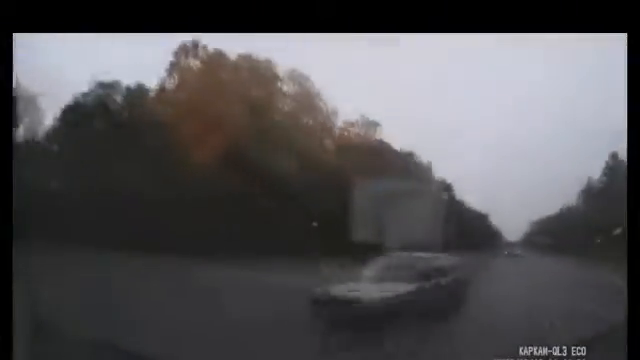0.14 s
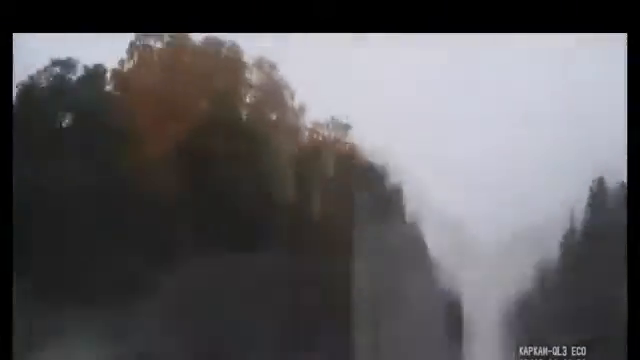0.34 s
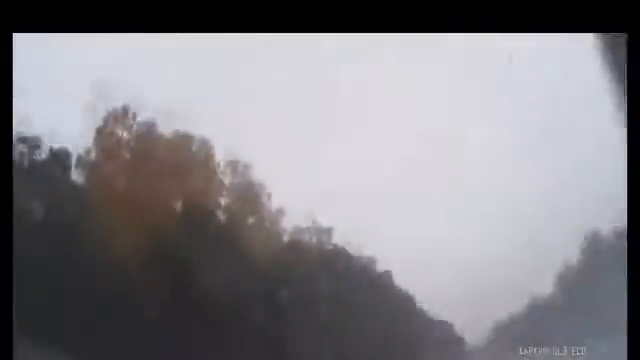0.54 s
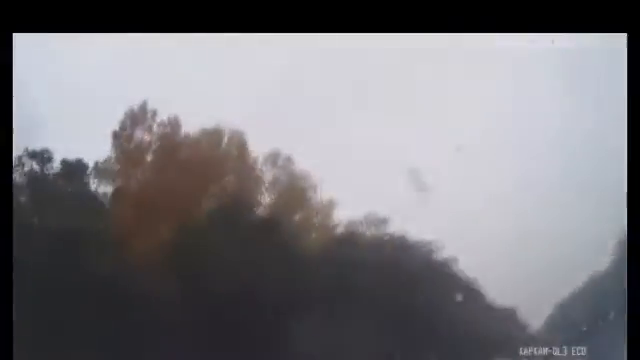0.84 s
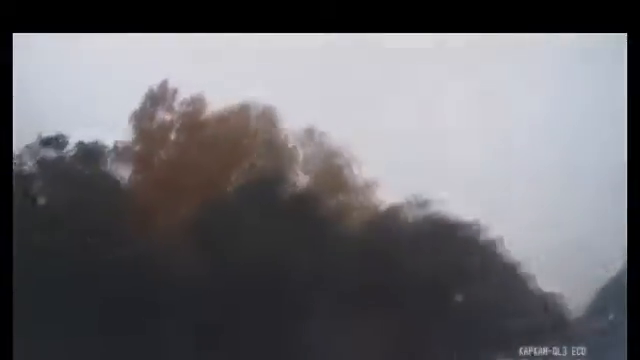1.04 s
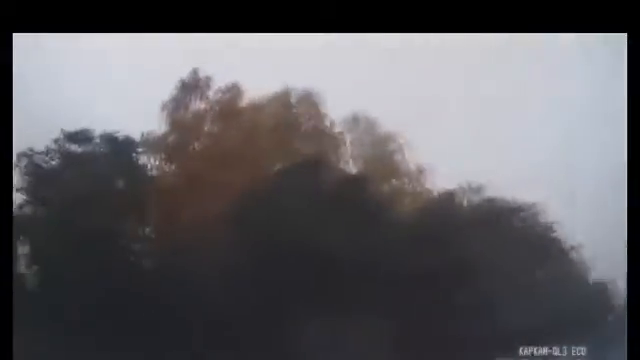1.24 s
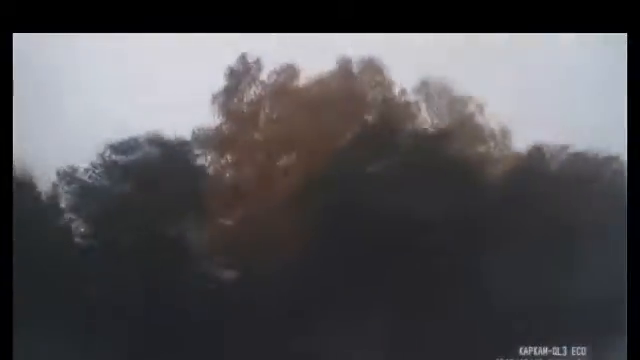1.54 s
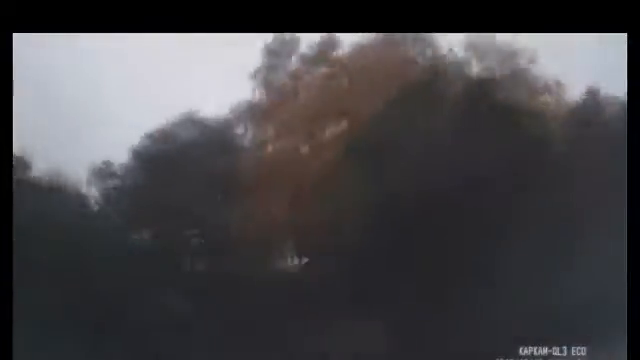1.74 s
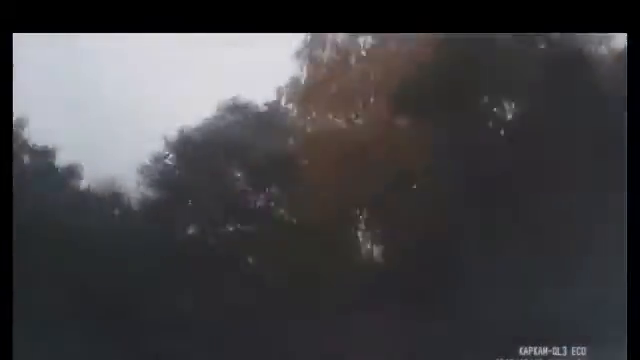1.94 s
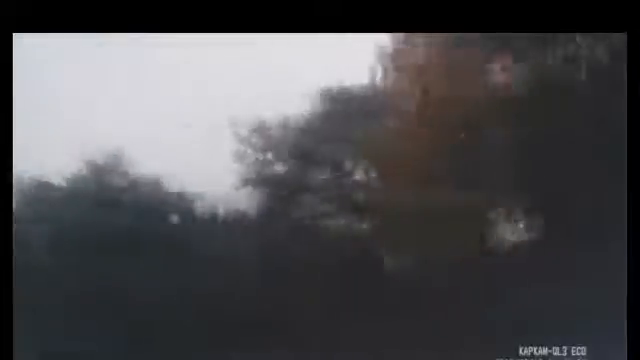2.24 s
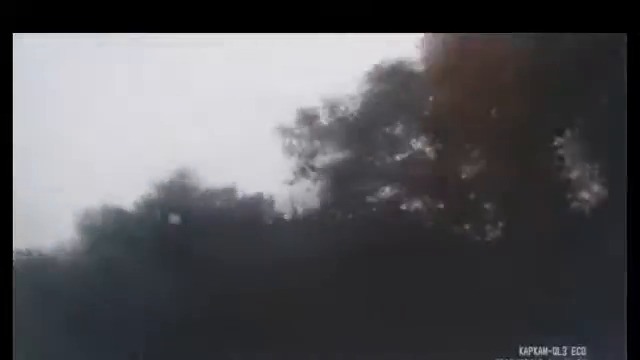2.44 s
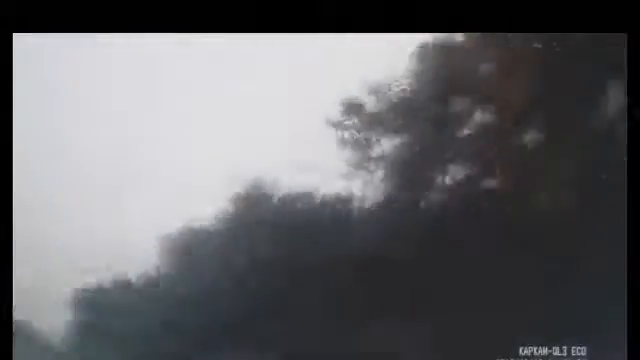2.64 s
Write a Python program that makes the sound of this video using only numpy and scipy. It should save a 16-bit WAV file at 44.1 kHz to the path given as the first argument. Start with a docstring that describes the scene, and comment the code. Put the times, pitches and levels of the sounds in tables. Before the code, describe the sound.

Violent car collision from the cabin, a booming smash and cracks, then rough jolting off the road.

```python
"""Inside a car, a collision is heard through an overloaded dashboard microphone.
Filtered noise and clicks make the rumble, tyre roar and grit; thumps ring under them. Jolts are decaying sines,
crumpling metal is dense clicks through panel resonances, and cracks are noise bursts with a short ring.
Splinters patter down as pitched clicks, stones tick on the body, and loose plastic trim knocks and squeaks."""
import sys
import numpy as np
from scipy import signal
from scipy.fft import rfft, irfft
from scipy.io import wavfile
from scipy.ndimage import uniform_filter1d

SR = 44100
rng = np.random.default_rng(int(sys.argv[2]) if len(sys.argv) > 2 else 0)


def transcribe(signal):
    """Save signal, clipped to [-1, 1], as a 16-bit WAV file at the path in sys.argv[1]."""
    frames = np.atleast_2d(signal).T
    limited = np.clip(frames, -1, 1)
    pcm = np.round(limited * 32767).astype(np.int16)
    wavfile.write(sys.argv[1], SR, pcm)


N = 123479  # length in samples
T = np.arange(N) / SR  # time of each sample, s
HZ = np.maximum(np.fft.rfftfreq(N, 1 / SR), 1)

# tyres on road and verge, relative levels over time: time_s, roar_db, grit_db
GROUND_LEVELS = [(0, -29.5, -43), (.17, -38, -49), (.23, -29, -44), (.44, -28, -42.5), (.5, -14.5, -9),
                 (.66, -17.5, -24), (.76, -15, -23), (.8, -22, -33), (.88, -24.5, -33.5),
                 (1.04, -23.5, -34), (1.35, -22.5, -37.5), (1.69, -19.5, -35.5), (1.82, -29, -42),
                 (1.92, -27.5, -39.5), (1.97, -27, -37), (2.11, -31.5, -38), (2.4, -36, -46),
                 (2.8, -32.5, -47)]
# spectrum of the tyre roar: frequency_hz, relative_level_db (per Hz)
ROAR_SPECTRUM = [(120, -29), (250, 9), (400, -2.5), (520, 4), (750, -1.5), (1100, -8), (1550, -31),
                 (2100, -11), (2800, -54), (5000, -106)]
# spectrum of grit and of the click in a trim knock: frequency_hz, relative_level_db (per Hz)
GRIT_SPECTRUM = [(900, 22), (2200, 18.5), (3400, 5.5), (4900, 4.5), (7000, 0.5), (10000, -5.5),
                 (12500, -13)]
# small contacts that excite both the metal and the trim
FOLDS_PER_S, FOLD_SPREAD_DB = 3000, 2.9
CRUNCH_ATTACK_S = 0.0032  # the splinters share it


def from_db(db):
    """Decibels to gain."""
    return 10 ** (np.asarray(db) / 20)


def rms_one(x):
    """Scale to rms 1."""
    return x / np.sqrt(np.mean(x ** 2) + 1e-20)


def gains(rows):
    """Each dB column of a curve as a gain per sample."""
    times_s, *columns_db = np.transpose(rows)
    return [from_db(np.interp(T, times_s, column)) for column in columns_db]


def colour(x, spectrum):
    """Give a steady signal a spectrum that falls away past its ends; rms 1."""
    hz, db = np.transpose(spectrum)
    ends = np.minimum(1, HZ / hz[0]) ** 2 * np.minimum(1, hz[-1] / HZ) ** 2
    curve = from_db(np.interp(np.log(HZ), np.log(hz), db))
    return rms_one(irfft(rfft(x) * ends * curve, N))


def cut(x, hz, kind="low", order=2):
    """Butterworth low- or high-pass."""
    sos = signal.butter(order, min(hz, .45 * SR), kind, fs=SR, output="sos")
    return signal.sosfilt(sos, x + 1e-18)


def band(x, hz, width):
    """Band-pass around a pitch; the width is a share of that pitch."""
    edges_hz = np.clip(hz * np.exp(np.array([-.5, .5]) * width), 10, .45 * SR)
    return signal.sosfilt(signal.butter(2, edges_hz, "band", fs=SR, output="sos"), x + 1e-18)


def even(x, span_s):
    """Even out swells slower than the span."""
    power = np.abs(uniform_filter1d(x * x, max(int(span_s * SR), 2)))
    return x / np.sqrt(power + 1e-6)


def ring(x, hz, t60):
    """Two-pole resonance: a unit click sets a sine of about height 1 ringing."""
    r = from_db(-60 / (t60 * SR))  # decay per sample
    w = 2 * np.pi * hz / SR
    return signal.lfilter([0, np.sin(w)], [1, -2 * r * np.cos(w), r * r], x + 1e-18)


def envelope(start, attack, hold, t60):
    """Linear attack, hold, exponential release."""
    age = T - start
    release = np.log(1000) * np.maximum(age - attack - hold, 0) / t60
    return np.clip(age / attack, 0, 1) * np.exp(-np.minimum(release, 20))


def grains(per_s, spread_db):
    """Random clicks of uneven size and random polarity."""
    sizes = from_db(spread_db * np.minimum(rng.exponential(1, N), 4))
    sizes = sizes * rng.choice([-1, 1], N)
    return sizes * (rng.random(N) < per_s / SR)


def scatter(per_s, spread_db, low_hz, high_hz, cycles, count=16):
    """Random contacts ring on a ladder of pitches, falling 60 dB in the given cycles; rms 1."""
    clicks, dealt = grains(per_s, spread_db), rng.integers(0, count, N)
    pitches_hz = np.geomspace(low_hz, high_hz, count)
    return rms_one(sum(ring(clicks * (dealt == k), hz, cycles / hz) for k, hz in enumerate(pitches_hz)))


def ride():
    """The body rumbles and booms; tyres roar over stones, clods thump the floor pan, and grit flies."""
    # body noise, relative levels over time: time_s, rumble_db, boom_db
    ride_levels = [(0, -16, -25), (.19, -22, -33), (.23, -14, -22.5), (.41, -20.5, -18.5), (.5, -11.5, -17),
                   (.68, -9.5, -11), (.86, -14.5, -14), (1.05, -15.5, -20), (1.3, -15, -16),
                   (1.6, -11, -15.5), (1.85, -13, -21.5), (2.14, -20.5, -26.5), (2.4, -18.5, -21.5),
                   (2.74, -21, -33)]
    # spectrum of the deep rumble: frequency_hz, relative_level_db (per Hz)
    rumble_spectrum = [(18, -6), (28, 5), (44, 4), (58, 1), (80, -15.5), (160, -83)]
    # spectrum of the cabin boom: frequency_hz, relative_level_db (per Hz)
    boom_spectrum = [(45, -56), (75, 0.5), (120, 4.5), (155, 0), (210, -12), (300, -10.5), (600, -63)]
    stones_per_s, stones_spread_db = 900, 2
    grit_per_s, grit_spread_db = 2100, 2
    rumble_gain, boom_gain = gains(ride_levels)
    roar_gain, grit_gain = gains(GROUND_LEVELS)
    white = rng.standard_normal((4, N))

    rumble = even(colour(white[0], rumble_spectrum), 0.119)
    boom = even(colour(white[1], boom_spectrum), 0.0625)
    thumps = even(scatter(70, 1.86, low_hz=186.2, high_hz=560, cycles=35), 0.23)
    stones = grains(stones_per_s, stones_spread_db) + 0.076 * white[2]
    tyres = even(colour(stones, ROAR_SPECTRUM), 0.06)
    grit = colour(grains(grit_per_s, grit_spread_db) + 0.17 * white[3], GRIT_SPECTRUM)

    body = from_db(-1.5) * (rumble_gain * rumble + boom_gain * boom)
    rolling = roar_gain * (from_db(-3.5) * tyres + from_db(-4) * thumps)
    return body + rolling + grit_gain * grit


def squeaks():
    """Brief slips of plastic on plastic: rough friction in one broad resonance that swells and dies."""
    # rubs and squeaks of the trim: start_s, level_db, pitch_hz
    slips = [(0.3, -22.5, 1910), (0.452, -28, 2080), (1, -26.5, 1950), (1.028, -20, 1950),
             (1.103, -27, 1980), (1.145, -26.5, 1940), (1.619, -20, 1900), (1.629, -27.5, 1960),
             (1.657, -29, 1980), (1.799, -23.5, 2130), (1.81, -22.5, 1970), (2.424, -29.5, 1930),
             (2.46, -28.5, 2040), (2.474, -28.5, 1970), (2.587, -38.5, 2010)]
    rise_s, width = 0.003, .11  # width as a share of the pitch
    friction = rng.standard_normal(N)
    out = 0
    for start, db, hz in slips:
        age = np.clip((T - start) / rise_s, 0, 20)
        swell = age * np.exp(1 - age)  # peaks at 1 after the rise
        out = out + from_db(db) * swell * even(band(friction, hz, width), 0.015)
    return out


def knocks():
    """Loose trim chatters home: a quick run of touches on its modes; soft contacts are duller."""
    # plastic trim knocks: start_s, level_db, hold_s, dull_above_hz
    hits = [(0.3008, -23, 0.0018, 7060), (1.026, -24, 0.0023, 2320), (1.777, -21, 0.0033, 1510),
            (2.265, -17, 0.0077, 4060), (2.558, -35, 0.0047, 5000)]
    # modes of the trim: pitch_hz, relative_level_db, t60_s
    trim_modes = [(585, 4.5, 0.093), (1170, -1, 0.011), (1650, -10, 0.0027), (1980, 2.5, 0.012),
                  (2700, -2, 0.01), (3370, -15.5, 0.0086)]
    click_db, release_t60_s = -15, 0.034
    touches = grains(FOLDS_PER_S, FOLD_SPREAD_DB)
    modes = sum(from_db(db) * rms_one(ring(touches, hz, t60)) for hz, db, t60 in trim_modes)
    chatter = modes + from_db(click_db) * colour(touches, GRIT_SPECTRUM)
    out = 0
    for start, db, hold, dull_hz in hits:
        shape = envelope(start, 0.0011, hold, release_t60_s)
        out = out + from_db(db) * shape * even(cut(chatter, dull_hz), 0.0033)
    return out


def jolts():
    """Each jolt sets the body swinging as a decaying sine, mostly at a low pitch."""
    # jolts of the body: start_s, level_db, pitch_hz, t60_s
    swings = [(0.429, -8, 130, 0.09), (0.451, -9.5, 145, 0.2), (0.479, 10.5, 189, 0.055),
              (0.5091, 10.5, 122.3, 0.092), (0.609, -9, 44, 0.09), (0.644, -2.5, 93.4, 0.11),
              (0.658, 2, 135, 0.025), (0.672, 3.5, 41.3, 0.1), (0.813, 4, 48.4, 0.029),
              (0.909, -5, 141, 0.31), (0.944, -9, 303, 0.11), (1.137, -1, 146.4, 0.16),
              (1.234, -2.5, 116, 0.088), (1.304, -8.5, 106, 0.078), (1.425, 2.5, 169, 0.011),
              (1.567, -1.5, 44.7, 0.48), (1.316, -16, 323, 0.13), (2.311, -11.5, 69, 0.15),
              (2.494, -7.5, 65, 0.17), (2.77, -17, 180, 0.11)]
    attack_s = 0.0024
    out = 0
    for start, db, hz, t60 in swings:
        swing = np.sin(2 * np.pi * hz * (T - start))
        out = out + from_db(db) * envelope(start, attack_s, 0, t60) * swing
    return out


def crunches():
    """Dense small folds ring the panels; each dent resounds at its own pitch and is dull above it."""
    # metal crumples or scrapes: start_s, hold_s, release_t60_s, level_db, dent_pitch_hz
    dents = [(0.478, 0.012, 0.026, 4, 478), (0.49, 0.025, 0.046, 0.5, 560), (0.53, 0.0085, 0.031, 2, 1550),
             (0.531, 0.017, 0.25, -1.5, 8350), (0.728, 0.0074, 0.2, -15, 1010),
             (0.93, 0.014, 0.059, -19.5, 980), (0.984, 0.0065, 0.03, -22, 1020),
             (1.348, 0.015, 0.064, -21, 1040), (1.431, 0.0061, 0.061, -19, 403),
             (1.535, 0.0035, 0.065, -8.5, 1700), (1.555, 0.018, 0.15, -17, 2090),
             (1.558, 0.0059, 0.048, -5, 703), (1.698, 0.0046, 0.053, -19.5, 1270),
             (2.046, 0.0065, 0.2, -27, 1430), (2.185, 0.011, 0.076, -20.5, 676),
             (2.206, 0.021, 0.22, -23, 410), (2.209, 0.035, 0.11, -32.5, 1480)]
    # spectrum of the folding metal: frequency_hz, relative_level_db (per Hz)
    metal_spectrum = [(60, 3), (200, -1), (520, 5), (750, -6.5), (1000, 5.5), (1400, -2), (1950, 3),
                      (2700, -9), (4500, -1), (8000, -10), (12500, -21)]
    # resonances of the body panels: pitch_hz, relative_level_db, t60_s
    panel_modes = [(494, -2, .07), (565, -4, .06), (750, -1, .12), (820, -3, .1), (960, -7, .12),
                   (1280, -5.5, .1), (1570, -6, .1), (1740, -6, .1), (1930, -5, .08), (2240, -7, .1),
                   (2620, -9, .07), (3000, -9, .05), (3480, -11, .05), (4265, -11, .09), (4460, -12, .09),
                   (4700, -13, .04)]
    panel_db, dent_db, dent_width = -1.5, -4, .4  # width as a share of the pitch
    folds = grains(FOLDS_PER_S, FOLD_SPREAD_DB)
    panels = 0
    for k, (hz, db, t60) in enumerate(panel_modes):
        polarity = (-1) ** k  # neighbouring modes alternate
        panels = panels + polarity * from_db(db) * rms_one(ring(folds, hz, t60))
    metal = colour(folds, metal_spectrum) + from_db(panel_db) * rms_one(panels)
    out = 0
    for start, hold, t60, db, hz in dents:
        dent = cut(metal, hz) + from_db(dent_db) * band(metal, hz, dent_width)
        out = out + from_db(db) * envelope(start, CRUNCH_ATTACK_S, hold, t60) * even(dent, 0.09)
    return out


def cracks():
    """A bright burst of fracture and the short ring of the part that broke."""
    # hard parts crack and snap: start_s, level_db, ring_pitch_hz, ring_level_db (against burst), hold_s, t60_s
    snaps = [(0.520, -10, 2010, 0, 0.0005, 0.02), (0.5952, -5, 2070, -9, 0.0008, 0.007),
             (0.6015, -13, 2440, -6, 0.0006, 0.014), (0.6082, -4, 2200, -8, 0.0009, .008),
             (0.6226, -3.5, 2120, -12, 0.0012, .012), (.6275, -4, 2050, -12, 0.0021, 0.0096),
             (0.7283, -3, 1730, 1.5, 0.0025, 0.015), (1.5598, -13, 2020, 6, 0.0016, 0.022)]
    low_hz, top_hz = 390, 5000
    fracture = cut(rng.standard_normal(N), low_hz, "high")
    burst = even(cut(fracture, top_hz, order=1), 0.021)
    out = 0
    for start, db, hz, ring_db, hold, t60 in snaps:
        tone = np.sin(2 * np.pi * hz * (T - start)) * np.sqrt(2)  # rms 1
        snap = burst + from_db(ring_db) * tone
        out = out + from_db(db) * envelope(start, 0.0003, hold, t60) * snap
    return out


def shards():
    """Splinters of the first blow patter down from the crumpling front, each with its own short ring."""
    start_s, t60_s, level_db = .534, .62, -13
    low_hz, high_hz = 686, 5000
    patter = scatter(400, 3.5, low_hz, high_hz, cycles=21)
    patter = even(cut(patter, low_hz, "high"), .035)
    return from_db(level_db) * envelope(start_s, CRUNCH_ATTACK_S, 0, t60_s) * patter


def ticks():
    """Single stones and fragments spatter the body: short noise bands, each with its own brightness."""
    # ticks on the body: start_s, level_db, centre_hz
    impacts = [(.648, -35, 4500), (.688, -38, 3120), (.706, -28, 3500), (0.774, -31, 6100),
               (.789, -53, 5000), (.831, -34, 8440), (0.856, -34, 4400), (1.0, -31, 5760),
               (1.113, -37, 5000), (1.618, -37.5, 5630), (1.7, -38.5, 5000), (1.946, -43, 5000),
               (1.977, -38.5, 5000), (2.114, -32.5, 3550), (2.556, -44.5, 4500)]
    t60_s, width = 0.04, 0.4  # width as a share of the centre
    spatter = rng.standard_normal(N)
    out = 0
    for start, db, hz in impacts:
        shape = envelope(start, 0.00059, 0, t60_s)
        out = out + from_db(db) * shape * rms_one(band(spatter, hz, width))
    return out


def cabin(x):
    """A short wash of reflections from glass and seats, made with decaying noise."""
    t60_s, wash_db = 0.12, -14.5
    echoes = cut(rng.standard_normal(N), 9100) * envelope(0, 0.008, 0, t60_s)
    wash = signal.fftconvolve(x, echoes / np.linalg.norm(echoes))[:N]
    return x + from_db(wash_db) * wash


def scene():
    """Everything reaches one point on the dashboard; the lows lean left and the tyre roar spreads a little."""
    lean_db, lean_fades_hz, spread_db = 1.85, 640, -23.5  # lean: approximate left-right difference
    small_parts = cabin(knocks() + squeaks() + ticks())
    mid = ride() + jolts() + crunches() + cracks() + shards() + small_parts
    lean = (from_db(lean_db / 2) - 1) * cut(mid, lean_fades_hz, order=1)
    roar_gain = gains(GROUND_LEVELS)[0]
    spread = from_db(spread_db) * roar_gain * colour(rng.standard_normal(N), ROAR_SPECTRUM)
    side = lean + spread
    return np.array([mid + side, mid - side])


def record(dry):
    """The microphone overloads hard on the blows, a little treble rides on the flat tops; the top is cut."""
    ceiling, knee = .92, 4  # a larger knee bends later and harder
    leak_db, leak_above_hz, cutoff_hz = -16, 1500, 12300
    clipped = dry / (1 + np.abs(dry / ceiling) ** knee) ** (1 / knee)
    lost_treble = cut(dry - clipped, leak_above_hz, "high")
    leaky = clipped + from_db(leak_db) * lost_treble
    return signal.sosfilt(signal.ellip(8, .3, 70, cutoff_hz, fs=SR, output="sos"), leaky)


dry = scene()
out = record(dry)
transcribe(out)
```